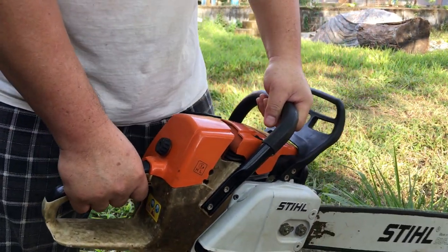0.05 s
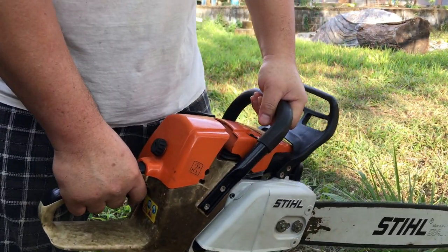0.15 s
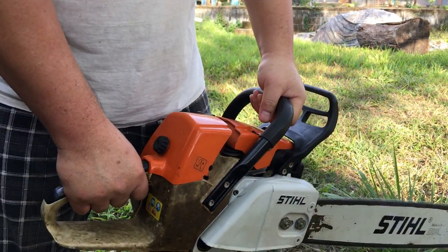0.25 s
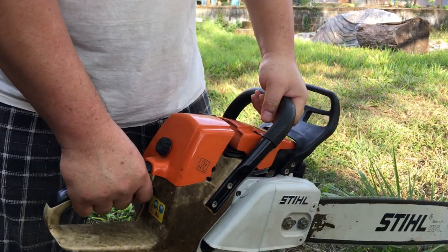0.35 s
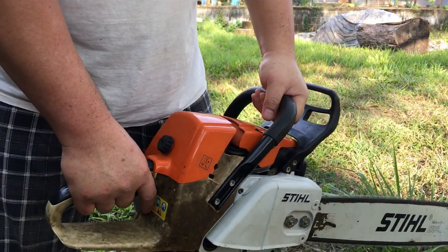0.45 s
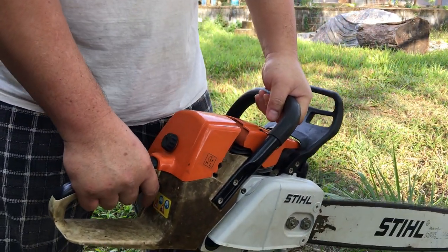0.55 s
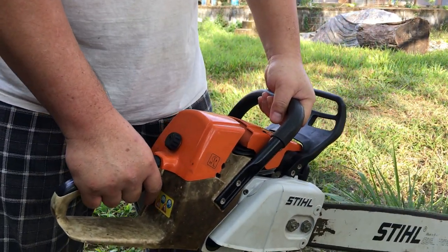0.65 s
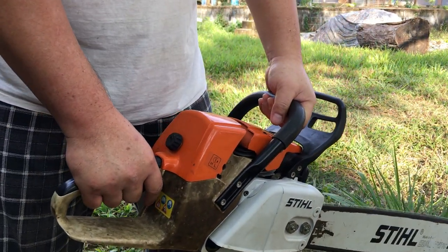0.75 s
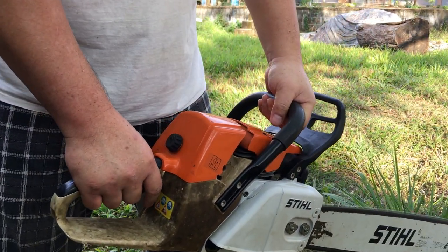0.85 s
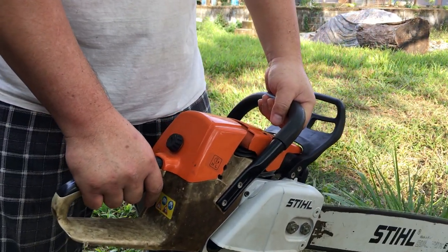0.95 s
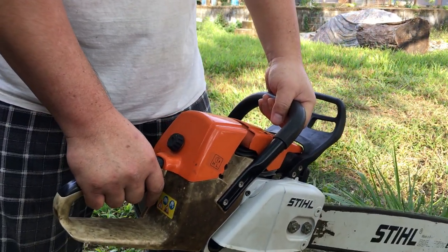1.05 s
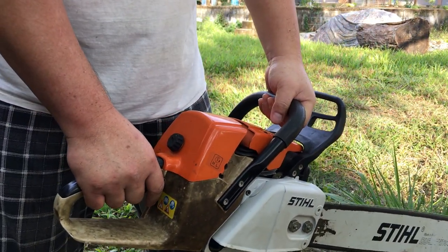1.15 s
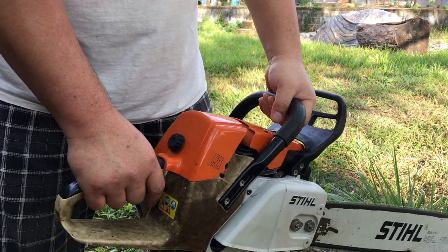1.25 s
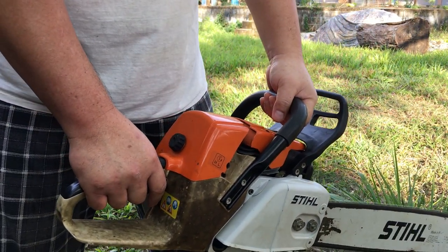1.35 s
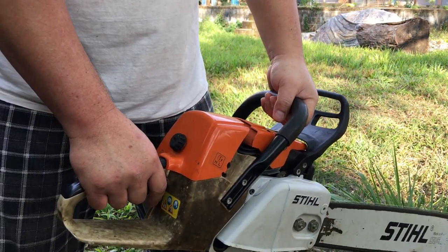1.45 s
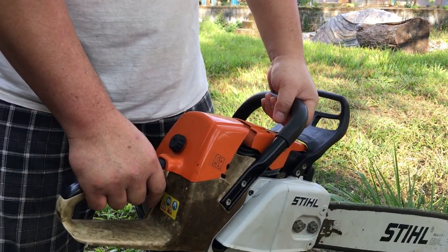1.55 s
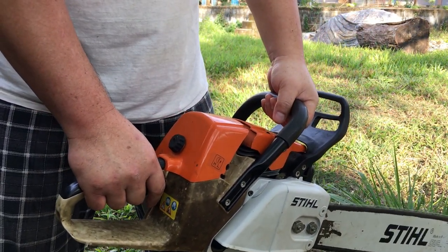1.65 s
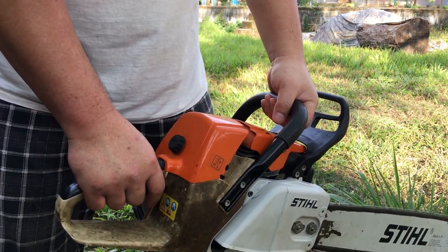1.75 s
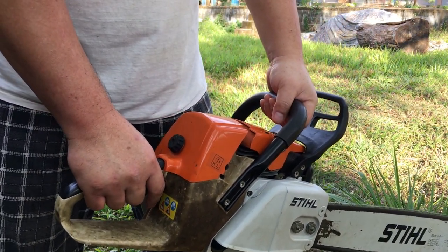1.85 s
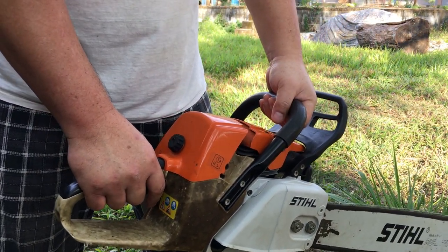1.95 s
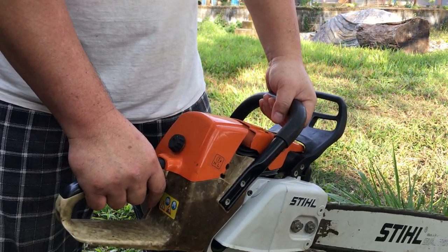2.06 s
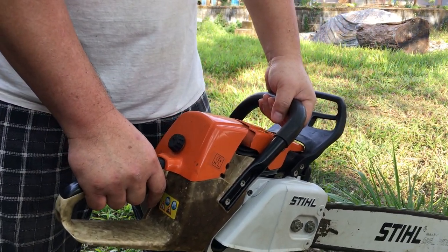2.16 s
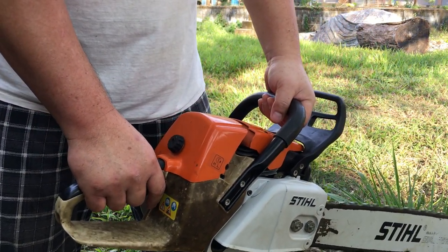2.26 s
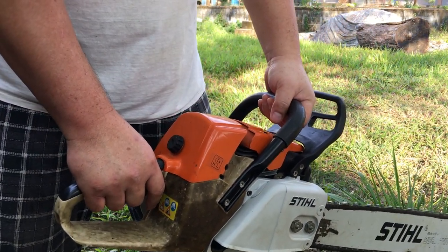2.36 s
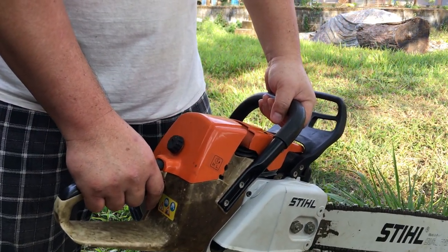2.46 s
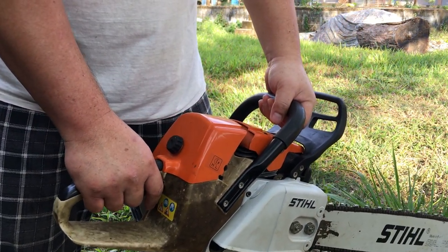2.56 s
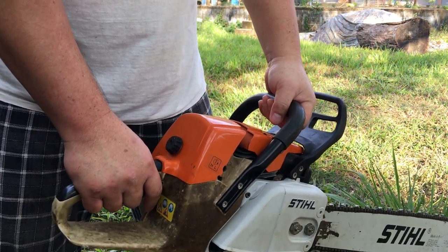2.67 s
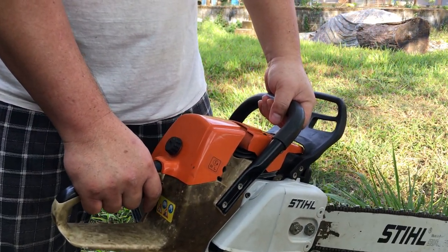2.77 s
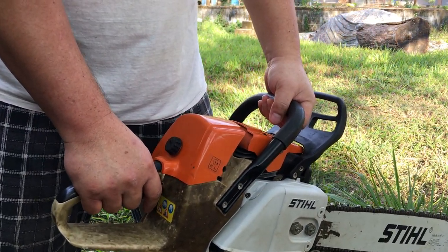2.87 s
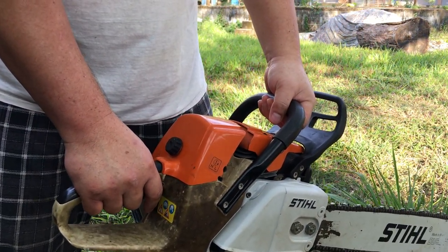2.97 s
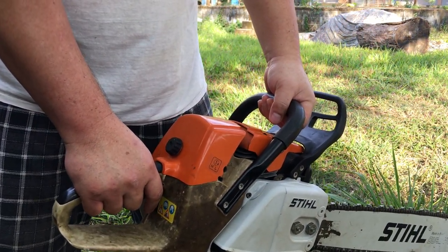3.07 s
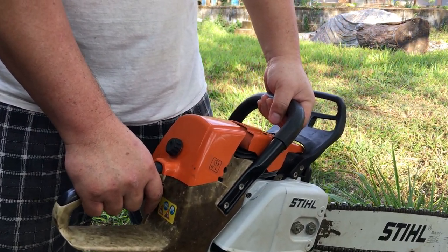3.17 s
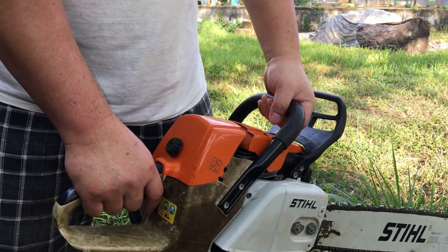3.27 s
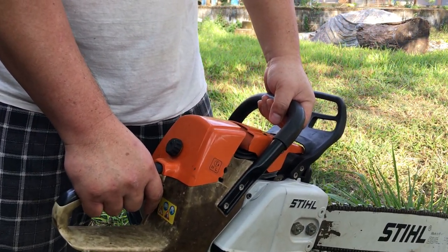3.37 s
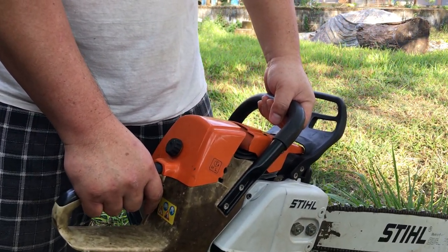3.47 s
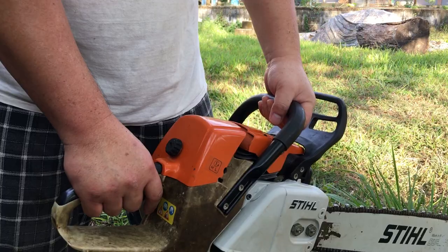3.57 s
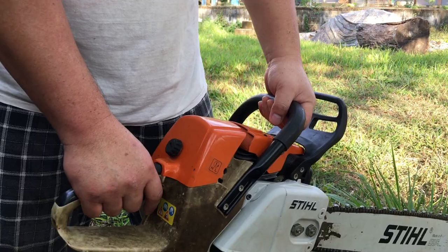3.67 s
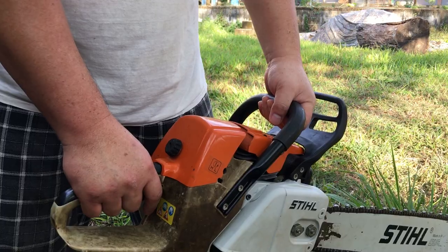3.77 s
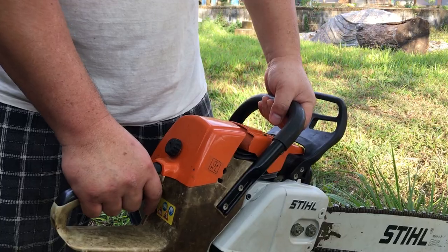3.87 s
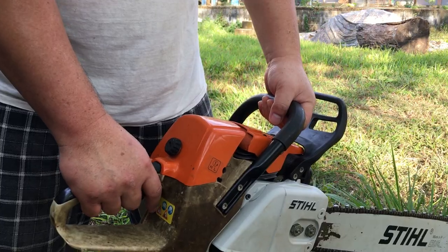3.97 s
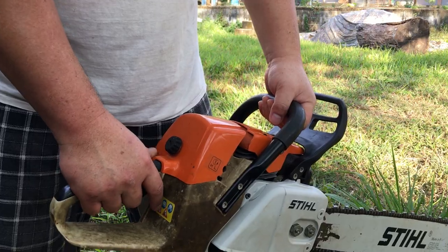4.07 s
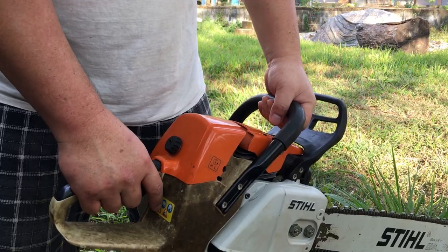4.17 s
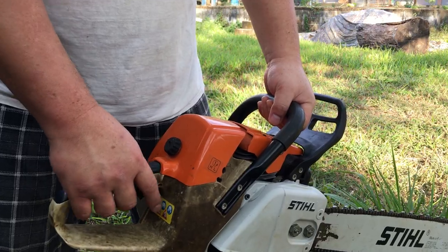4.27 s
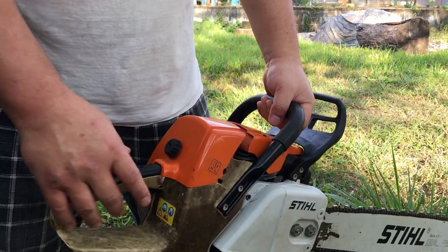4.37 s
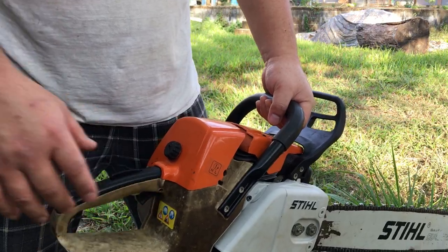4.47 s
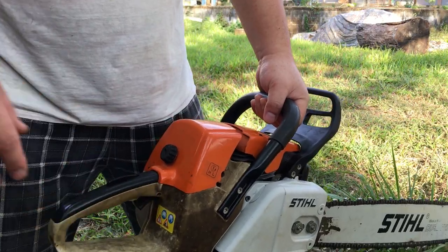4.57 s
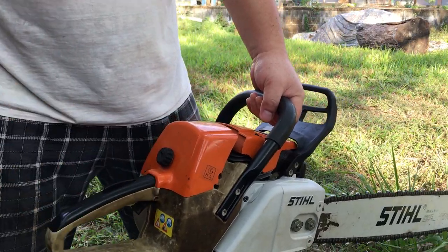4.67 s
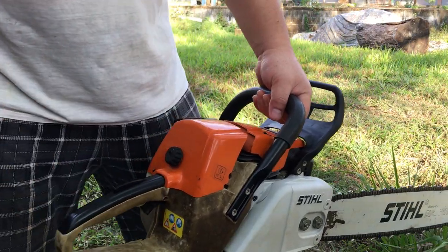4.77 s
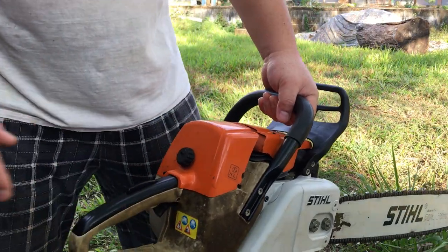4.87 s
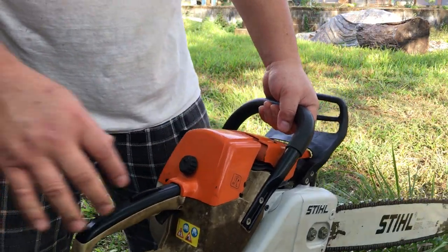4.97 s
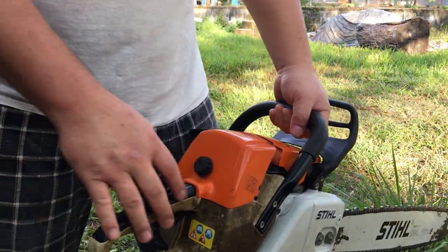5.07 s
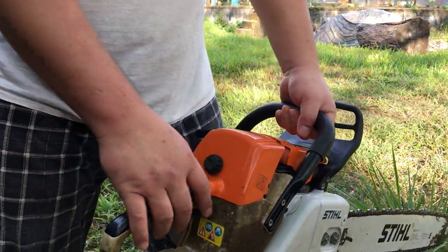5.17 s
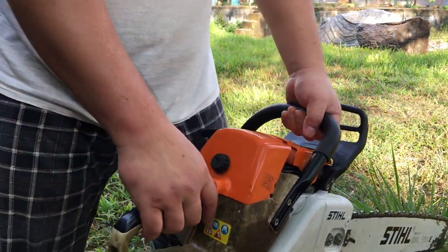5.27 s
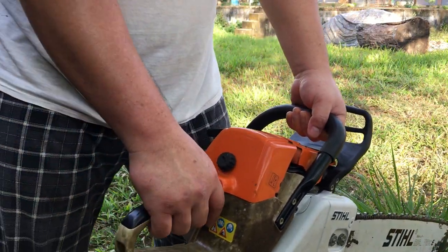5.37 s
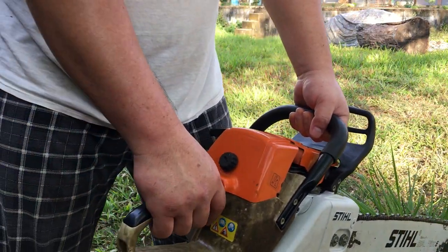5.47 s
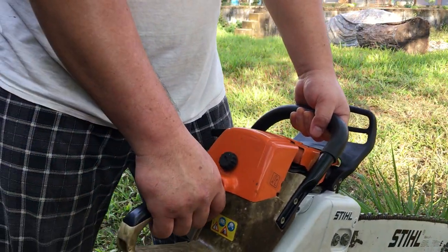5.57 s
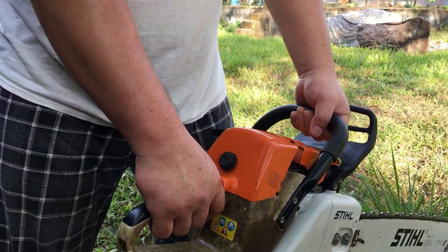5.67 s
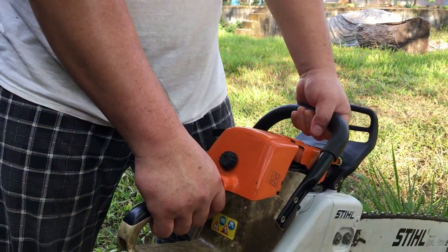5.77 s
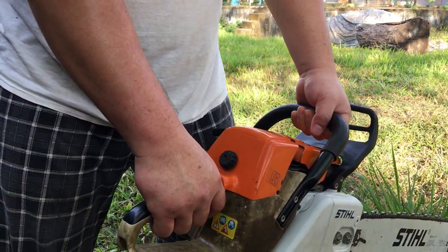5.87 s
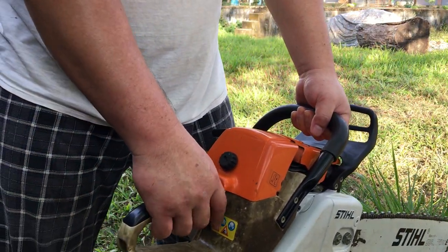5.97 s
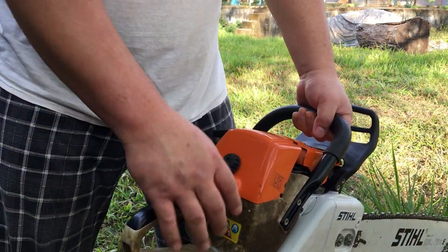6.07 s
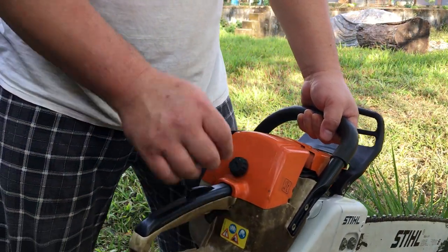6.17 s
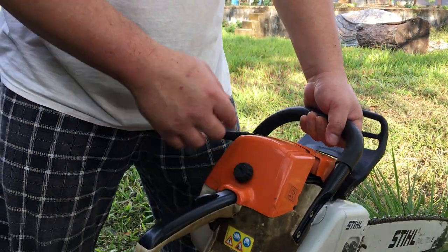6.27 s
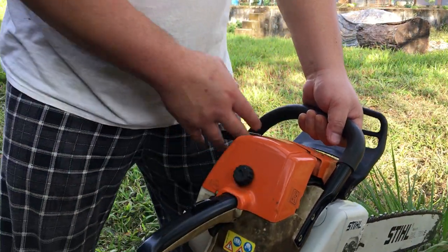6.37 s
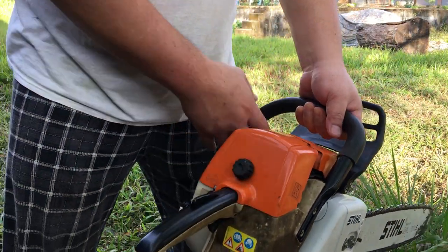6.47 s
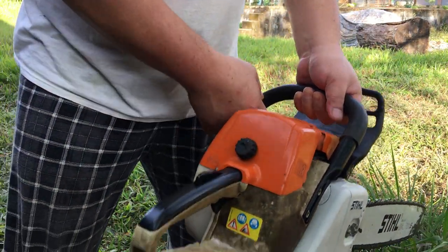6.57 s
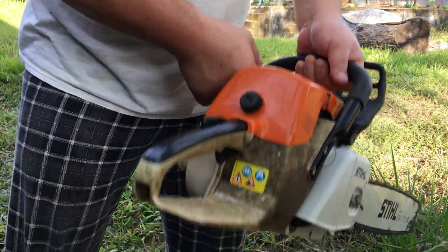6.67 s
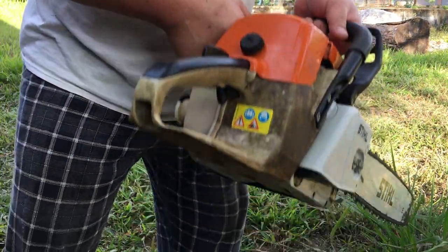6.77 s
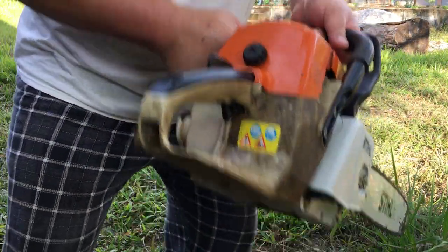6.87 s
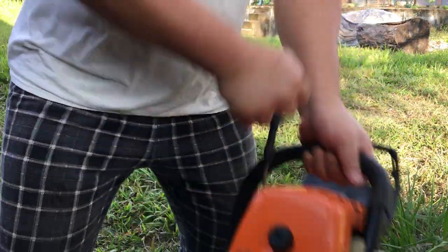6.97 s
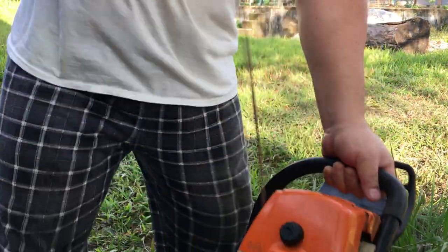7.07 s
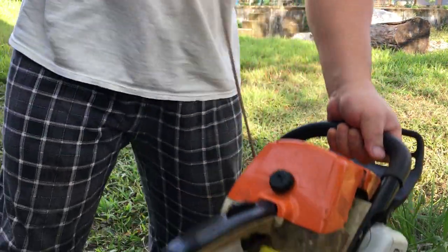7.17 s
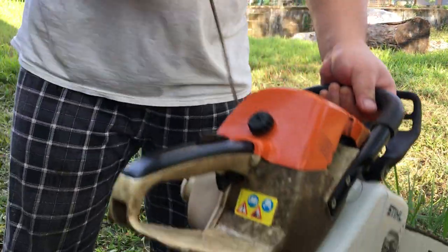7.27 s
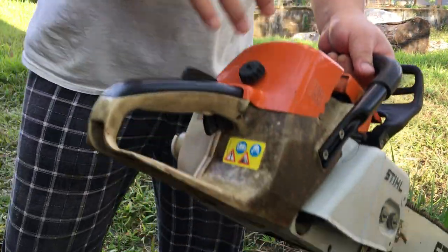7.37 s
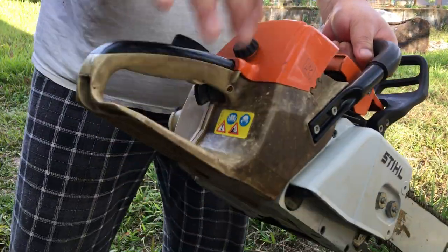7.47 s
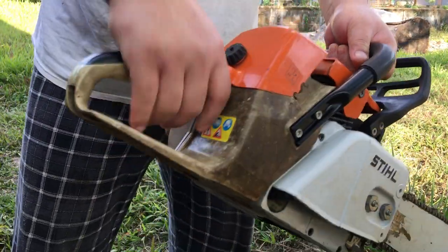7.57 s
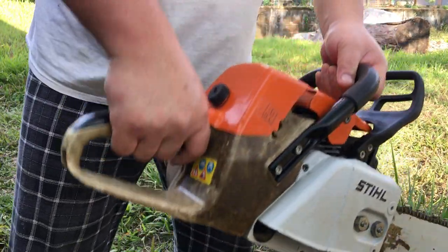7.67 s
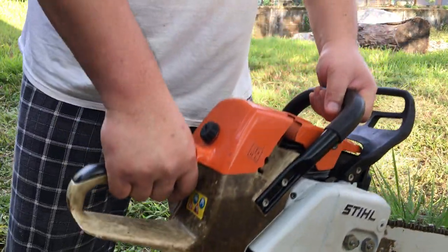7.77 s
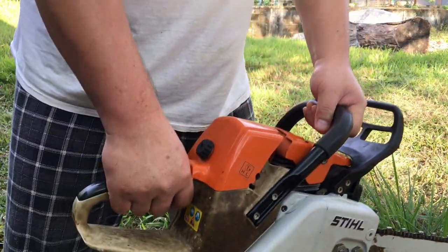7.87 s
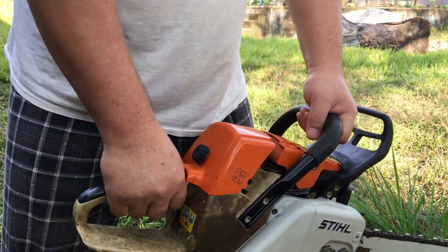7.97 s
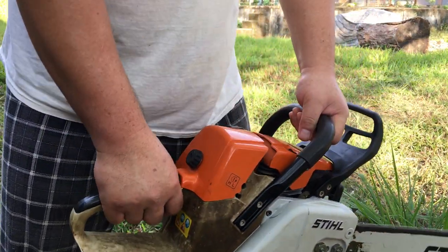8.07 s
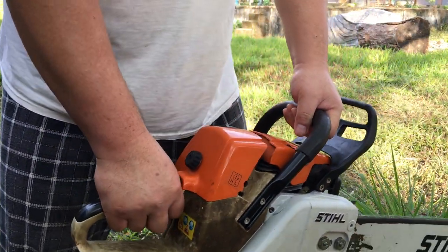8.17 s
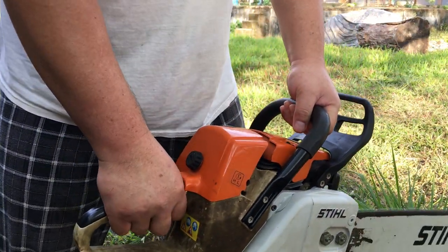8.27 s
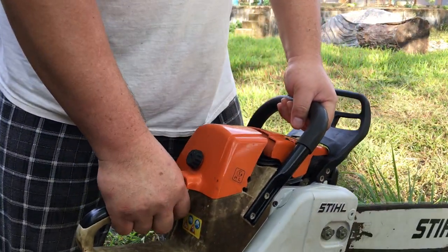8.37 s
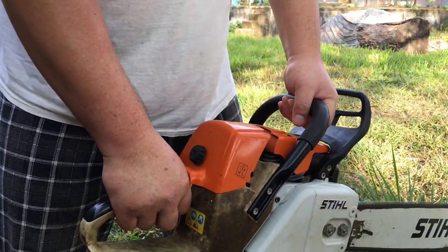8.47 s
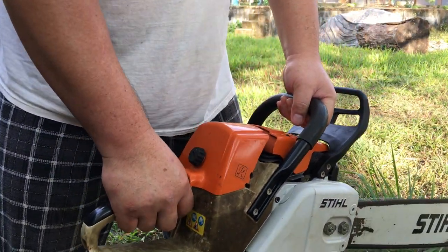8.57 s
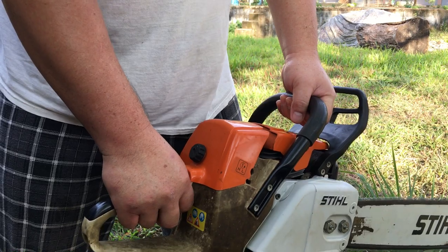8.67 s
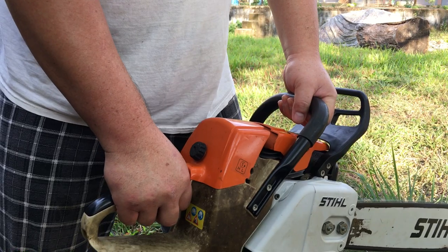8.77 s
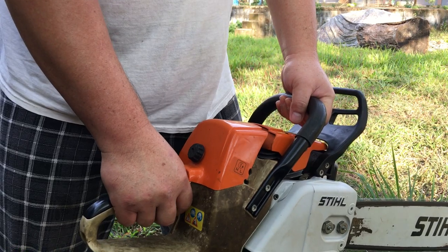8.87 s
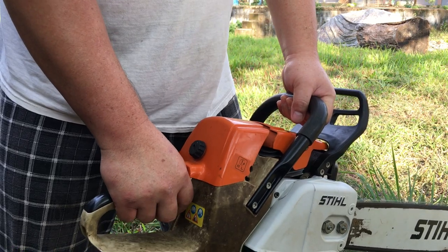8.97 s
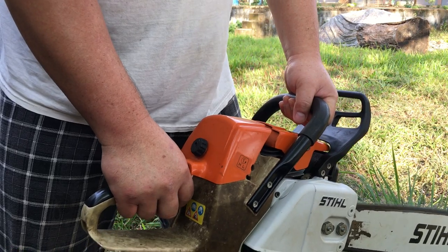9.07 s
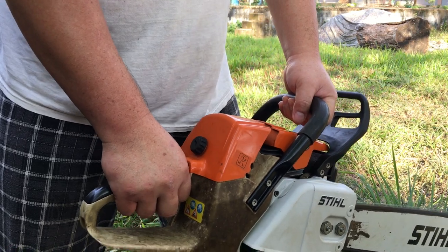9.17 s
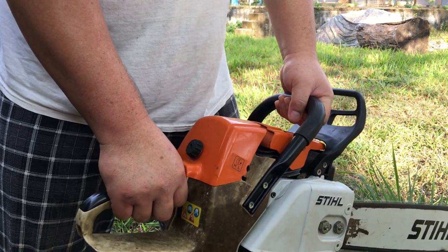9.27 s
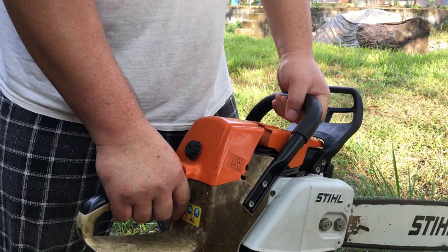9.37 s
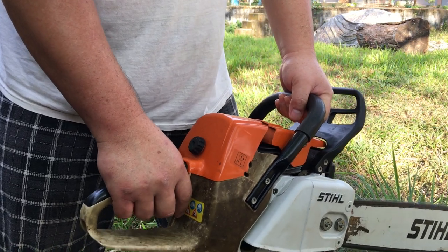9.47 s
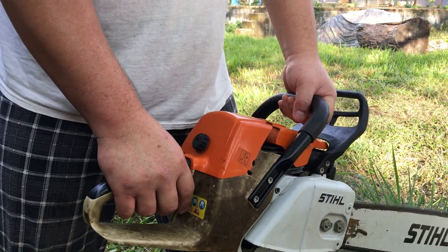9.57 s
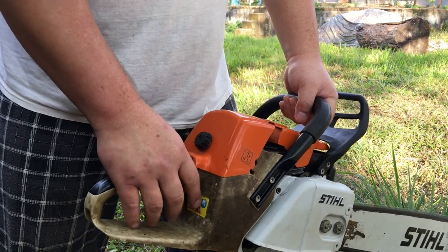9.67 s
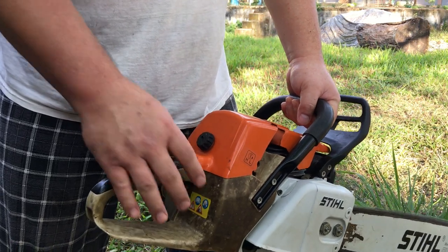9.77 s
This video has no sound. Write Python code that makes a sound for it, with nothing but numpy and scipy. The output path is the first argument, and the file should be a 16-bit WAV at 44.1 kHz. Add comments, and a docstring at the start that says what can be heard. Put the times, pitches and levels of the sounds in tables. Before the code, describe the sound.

Outdoors and very close, a two-stroke chainsaw gives three quick snarling throttle blips, coasts down to a rattling, popping idle, then is switched off and chuffs to a halt with a faint metallic ring. Soft plastic knocks and thin bird whistles follow over quiet air. A hard starter knock brings back a louder uneven idle, then five short rising revs.

```python
"""A two-stroke chainsaw close by in a garden: blipped, left to idle, switched off, pull-started, blipped again.
Every crank turn excites resonators: gas puffs through the muffler, shaken casing and chain ring with noise.
It fires on each turn under throttle, only now and then at idle, as pressure pulses with a crack of gas.
In the pause a steel part rings as a decaying sine, hands knock the housing in noise bursts and a bird
whistles gliding tones; behind lie a filtered-noise murmur and a thin insect hiss."""
import sys
import numpy as np
from scipy import signal
from scipy.fft import rfft, irfft
from scipy.io import wavfile
from scipy.ndimage import uniform_filter1d

SR = 44100
rng = np.random.default_rng(int(sys.argv[2]) if len(sys.argv) > 2 else 0)


def transcribe(signal):
    """Save signal, clipped to [-1, 1], as a 16-bit WAV file at the path in sys.argv[1]."""
    frames = np.atleast_2d(signal).T
    limited = np.clip(frames, -1, 1)
    pcm = np.round(limited * 32767).astype(np.int16)
    wavfile.write(sys.argv[1], SR, pcm)


N = 433503
T = np.arange(N) / SR  # time [s]

# throttle blips: (opens [s], closes [s], top speed [turns/s], relative firing level [dB])
BLIPS = [(-.3, 0.032, 117.6, 2), (0.134, 0.246, 144.3, -0.5), (0.352, 0.462, 161.2, -2.5),
         (8.065, 8.182, 80.37, 3), (8.297, 8.417, 123, 1), (8.53, 8.658, 154.3, -1),
         (8.816, 8.943, 165.3, -3.5), (9.26, 9.403, 158.8, -2.5)]
# lone sharp firings, about every sixth turn at idle: (time [s], relative level [dB])
POPS = [(0.1348, -10.5), (1.243, -16), (1.3482, -12), (1.4617, -12), (1.5858, -12), (1.7, -11),
        (1.8048, -11), (1.9085, -10.5), (2.162, -17.5), (2.3318, -11), (2.457, -11), (2.5629, -9.5),
        (2.7427, -14), (2.834, -11), (2.9242, -11.5), (3.088, -15), (3.1615, -12), (3.2338, -11),
        (3.3741, -11), (3.4664, -10.5), (3.57, -11.5), (3.86, -18), (4.0077, -11.5), (7.1217, -8),
        (7.2058, -15), (7.2644, -11.5), (7.34, -13), (7.415, -13), (7.492, -14), (7.644, -14), (7.7, -15),
        (7.8325, -13), (7.889, -10.5), (8.089, -15), (8.299, -13.5)]
# slow compression strokes without a firing: (time [s], relative muffler level [dB], relative rattle level [dB])
STROKES = [(4.385, -15, -21), (4.432, -6, -12.5), (4.488, -10, -10.5), (4.556, -9, -12),
           (4.637, -10.5, -19), (4.740, -12.5, -23.5), (4.892, -23, -26.5), (5.031, -33, -46),
           (7.093, -9.5, -9)]
# spectrum of the puffs in the muffler chamber: (frequency [Hz], level [dB])
MUFFLER = [(30, -17.5), (55, -5.5), (110, -14), (170, -9.5), (215, -1.5), (270, 4.5), (330, 1), (400, 3),
           (450, -2.5), (510, -21), (620, -10.5), (950, -23), (1300, -29.5), (4000, -68.5)]
# spectrum of the muffler's steel shell: (frequency [Hz], level [dB])
SHELL = [(300, -16.5), (500, -19), (590, 3), (700, 0), (800, -2.5), (930, 5.5), (1060, -18), (1200, -4.5),
         (1600, -7), (3000, -27.5)]
# spectrum of the exhaust pressure pulses: (frequency [Hz], level [dB])
EXHAUST = [(30, -15.5), (70, 11), (150, 6), (280, 10.5), (400, 7), (510, -8), (700, 5), (950, 1.5),
           (1200, -25.5), (2300, -8.5), (5000, -17), (15000, -51.5)]
# spectrum of the cracking gas: (frequency [Hz], level [dB])
CRACK = [(200, -25), (800, 11.5), (2200, 6.5), (2900, 0), (4500, 4.5), (6500, 8.5), (9500, 7), (12500, 3.5),
         (16000, -3)]
# spectrum of the shaken casing: (frequency [Hz], level [dB])
CASING = [(300, -12.5), (520, -11), (700, -19), (1000, -2.5), (1200, -12), (1600, -6), (1950, -11),
          (2150, 0), (2280, -8.5), (2400, -3), (2700, -29), (4000, -16), (12000, -24.5)]
# spectrum of the rattling chain: (frequency [Hz], level [dB])
CHAIN = [(1200, -22), (2600, -4.5), (3300, 1.5), (4300, 1), (4900, -5), (5800, 2.5), (7000, -3.5),
         (7900, -7), (9300, -1), (10400, -9), (11500, -4.5), (13000, -10), (16000, -20.5)]

# the ignition is cut, the crank falls to single strokes, the cord restarts it [s]
CUT_S, STALL_S, RESTART_S = 4.055, 4.41, 7.115
# idle speed before and after the restart [turns/s]; friction slows the dead engine
IDLE_HZ, RESTART_IDLE_HZ, FRICTION_HZ_PER_S = 53, 50, 87
# off throttle the speed decays exponentially; the knee says how abruptly the idle catches it
COAST_S, COAST_KNEE, THROTTLE_LAG_S = 1.02, 7, .012
# a lone firing kicks the crank ahead, then it sags again
KICK_HZ, KICK_S = 3, .1
# each part's gain at idle speed [dB], before the swell, and its rise with speed [dB per octave]
MUFFLER_DB, MUFFLER_DB_PER_OCTAVE = -22.5, -0.5
CASING_DB, CASING_DB_PER_OCTAVE = -28.5, 3.5
CHAIN_DB, CHAIN_DB_PER_OCTAVE = -31.5, 5.5
# the muffler swells slightly less than the rattling parts [dB per dB]
MUFFLER_SWELL = 0.95
# the chain slides to rest after the stall: decay [s]
CHAIN_SLIDE_S = 0.067
# a steel part rings on after the stall: pitch, level, decay
RING_HZ, RING_DB, RING_S = 1785, -45, .28
# the muffler's main resonance, which stands out on fast turns: centre, width, boost
BOOM_HZ, BOOM_WIDTH_HZ, BOOM_DB = 280, 83, 5
# the shell barks just before the chamber booms, so each stroke falls in pitch
BARK_LEAD_S = .002
# below idle the puffs grow long and deep: centre, width, boost as the speed tends to zero
DEEP_HZ, DEEP_WIDTH_HZ, DEEP_DB = 165.7, 70, 14


def undb(db):
    """Level to amplitude: 20 dB is a factor of ten."""
    return 10 ** (np.asarray(db) / 20)


def noise():
    """White noise of unit rms: equal power at all frequencies."""
    return rng.standard_normal(N)


def colour(x, points):
    """Minimum-phase filtering of unit energy with the given spectrum, falling off below its first point."""
    hz, db = np.transpose(points)
    grid = np.maximum(np.fft.rfftfreq(8192, 1 / SR), 1)
    gain = undb(np.interp(np.log(grid), np.log(hz), db))
    gain = gain * np.minimum(grid / hz[0], 1)
    # keeping only the causal half of the cepstrum makes the phase minimal
    cepstrum = irfft(np.log(gain))
    causal = 2 * cepstrum[:len(grid)]
    response = irfft(np.exp(rfft(causal, len(cepstrum))))[:len(grid)]
    return signal.fftconvolve(x, response / np.linalg.norm(response))[:N]


def resonance(x, hz, width_hz):
    """A single damped resonator: its bandwidth sets how long it rings."""
    return signal.lfilter(*signal.iirpeak(hz, hz / width_hz, fs=SR), x)


def reflect(x, tail):
    """Diffuse reflection: convolution with an echo tail brought to unit energy."""
    return signal.fftconvolve(x, tail / np.linalg.norm(tail))[:N]


def taps(times, sizes):
    """Ideal impulses, each shared between two neighbouring samples to keep its exact time."""
    out, place = np.zeros(N), np.clip(np.asarray(times) * SR, 0, N - 2)
    np.add.at(out, place.astype(int), sizes * (1 - place % 1))
    np.add.at(out, place.astype(int) + 1, sizes * (place % 1))
    return out


def fade(x, decay_s):
    """Exponential damping: each impulse becomes a tail of the same height."""
    return signal.lfilter([1], [1, -np.exp(-1 / (decay_s * SR))], x + 1e-18)


def steady(x, size=3500):
    """Power normalisation: the running rms is brought to about 1."""
    power = uniform_filter1d(uniform_filter1d(x ** 2, size), size)
    return x / np.sqrt(np.abs(power) + np.mean(x ** 2) / 1000)


def engine(jitter=0.014, idle_hz=55):
    """Periodic excitation by the crank: parts rattle louder with speed, firings mask the soft puffs."""
    crank_hz = speed()
    times, hz = crank(crank_hz)
    loose = np.minimum(idle_hz / hz, 1)  # a slow engine runs more unevenly
    times = times + jitter * loose ** 2 * rng.standard_normal(len(times)) / hz
    turning = uniform_filter1d(1. * running(), size=900)
    sliding = np.maximum(turning, np.exp(-np.abs(T - STALL_S) / CHAIN_SLIDE_S))
    octaves = np.log2(crank_hz / IDLE_HZ)
    swell_db = swell(T)
    muffler_gain = turning * undb(MUFFLER_DB + MUFFLER_DB_PER_OCTAVE * octaves + MUFFLER_SWELL * swell_db)
    casing_gain = turning * undb(CASING_DB + CASING_DB_PER_OCTAVE * octaves + swell_db)
    chain_gain = sliding * undb(CHAIN_DB + CHAIN_DB_PER_OCTAVE * octaves + swell_db)
    chamber, shell = muffler(times, hz, loose)
    shell = shell * np.interp(T, times, loose) ** -.25  # a little louder at speed
    casing, chain = clatter(times, hz, loose)
    puffs = chamber * muffler_gain + undb(-4.5) * shell * casing_gain
    puffs = undb(-10 * throttle(T)) * puffs
    return puffs + casing * casing_gain + chain * chain_gain + firing(times)


def running():
    """Free rotation: true while the crank spins by itself."""
    return (T < STALL_S) | (T > RESTART_S)


def speed():
    """Rotational dynamics [turns/s]: blips drive the crank up, it coasts to idle, friction slows it once cut."""
    idle = np.where(T < RESTART_S, IDLE_HZ, RESTART_IDLE_HZ)
    hz = idle
    for opens, closes, top_hz, db in BLIPS:
        peak_s = closes + THROTTLE_LAG_S
        rise = np.interp(T, [opens, peak_s], [np.interp(opens, T, hz), top_hz])
        left = np.exp(-COAST_KNEE * np.maximum(T - peak_s, 0) / COAST_S)
        coast = idle * (1 + ((top_hz / idle) ** COAST_KNEE - 1) * left) ** (1 / COAST_KNEE)
        hz = np.select([T < opens, T < peak_s], [hz, rise], coast)
    kicks = KICK_HZ * fade(taps(np.transpose(POPS)[0], 1.), KICK_S)
    braking = FRICTION_HZ_PER_S * np.maximum(T - CUT_S, 0) * (T < RESTART_S)
    return np.maximum(hz + kicks - braking, 20)


def crank(hz):
    """Phase is the integral of frequency: returns the time and speed of each whole turn."""
    angle = 2 * np.pi * np.cumsum(hz) / SR
    # lone firings and the first slow stroke are made to fall on whole turns
    marks = np.sort([s for s, db in POPS] + [STROKES[0][0]])
    excess = np.unwrap(np.interp(marks, T, angle) % (2 * np.pi))
    angle = angle - np.interp(T, marks, excess)
    new_turn = np.diff(np.floor(angle / (2 * np.pi))) > 0
    turn = np.flatnonzero(new_turn & running()[1:])
    return T[turn], hz[turn]


def throttle(times, open_s=0.011, close_s=0.014):
    """Amplitude envelope of the firing: the throttle opens quickly and closes more slowly."""
    strength = 0
    for opens, closes, top_hz, db in BLIPS:
        opening = np.clip((times - opens) / open_s, 0, 1)
        closing = np.clip((closes - times) / close_s + .5, 0, 1)
        strength = strength + undb(db) * opening * closing
    return strength


def swell(times):
    """Slow level envelope of the running saw [dB] at these times."""
    # overall level, on top of each part's own: (time [s], level [dB])
    swell_points = [(.5, -2), (.9, -1.5), (1.8, -0.44), (2.4, 3), (3.3, 4), (4.03, 4), (4.38, 0), (7.15, 4),
                    (7.5, 7.5), (8.03, 5), (8.25, 2), (8.49, -3.5), (8.7, -1.5), (9.8, -2.5)]
    return np.interp(times, *np.transpose(swell_points))


def firing(times, rough_db=.7, gulp_s=.04):
    """Impulsive combustion: every throttled turn sends a pressure pulse and a crack of gas; the intake gulps."""
    firings = taps(times, throttle(times) * undb(rough_db * rng.standard_normal(len(times))))
    exhaust = undb(12.5) * colour(firings, EXHAUST)
    gas = undb(-15) * colour(fade(firings, 0.0042) * noise(), CRACK)
    # the gulp sets in over the 14 ms before each opening
    opened = taps([opens for opens, *rest in BLIPS[1:]], 1.)
    opened = uniform_filter1d(opened, size=600, origin=-299)
    gulp_spectrum = [(30, -15), (80, -19), (380, -7), (550, -25.5), (3000, -35.5)]
    gulp = undb(-14.5) * colour(fade(opened, gulp_s) * noise(), gulp_spectrum)
    return gas + gulp - exhaust


def muffler(times, hz, loose, rough_db=1.1, burn_db=3, bass_hz=130,
            suck_turns=.115, suck=.6, coast_suck=.25, longest_s=.0022):
    """Cavity and shell resonance: each turn puffs in, then sucks back, sooner at speed; uneven burns ring steel."""
    chance = rng.standard_normal((len(times), 2)).T
    sizes = undb(rough_db * loose * chance[0])
    slow = loose > .8
    back = times + np.minimum(suck_turns / hz, longest_s)
    idling = taps(times, sizes * slow) - suck * taps(back, sizes * slow)
    fast = taps(times, sizes * ~slow) - coast_suck * taps(back, sizes * ~slow)
    # coasting fast on a shut throttle moves little gas: fast turns lose their bass
    fast = signal.sosfilt(signal.butter(2, bass_hz, "high", fs=SR, output="sos"), fast)
    fast = fast + undb(BOOM_DB) * resonance(fast, BOOM_HZ, BOOM_WIDTH_HZ)
    dying = taps(times, sizes * np.clip(1 - hz / IDLE_HZ, 0, 1))
    idling = idling + undb(DEEP_DB) * resonance(dying, DEEP_HZ, DEEP_WIDTH_HZ)
    barks = times - BARK_LEAD_S * loose
    burns = undb(burn_db * loose ** 2 * chance[1])
    sputter = undb(-15) * fade(taps(barks, burns * slow), 0.0027) * noise()
    chamber = steady(colour(idling + fast, MUFFLER))
    shell = steady(colour(taps(barks, burns) + sputter, SHELL), size=6000)
    return chamber, shell


def clatter(times, hz, loose, scatter_db=8.5, knock_s=0.02):
    """Structure-borne sound: the piston slaps twice a turn, shaking casing and chain."""
    chance = rng.standard_normal((len(times), 3)).T
    early = times - (0.32 + 0.11 * loose ** 2 * chance[0]) / hz
    slaps = taps(early, undb(scatter_db * loose * chance[1]))
    slaps += taps(times, undb(-12 + scatter_db * loose * chance[2]))
    shaking = fade(slaps, .007)
    # part of the knock is alike on every turn, more so at speed, which carries the pitch up into the treble
    age = T[:SR // 50]
    one_knock = rng.standard_normal(len(age)) * np.exp(-age / knock_s)
    knock = signal.fftconvolve(taps(times, 1.), one_knock)[:N]
    alike = np.interp(T, times, np.clip(.72 - .6 * loose, .1, .5))
    casing = np.sqrt(1 - alike) * steady(colour((shaking + 0.39) * noise(), CASING))
    casing = casing + np.sqrt(alike) * steady(colour(knock, CASING))
    # the chain's level flickers in steps of 40 samples
    links = undb(3.5 * np.repeat(rng.standard_normal(N // 40 + 1), 40)[:N])
    chain = steady(colour((shaking + 0.94) * links * noise(), CHAIN))
    chain = chain + alike * steady(colour(knock, CHAIN))
    return casing, chain


def idle_pops(tail_s=0.011):
    """Impulsive jet noise: a lone firing cracks sharply and pushes a slug of gas out of the muffler."""
    s, db = np.transpose(POPS)
    fired = taps(s, undb(db))
    crack = uniform_filter1d(fade(fired, .003), size=50)
    crack = crack + 0.096 * fade(fired, tail_s)
    pushed = taps(s + 0.0027, undb(db + swell(s)))
    slug_spectrum = [(30, -18), (70, 6), (150, 6.5), (350, -2.0), (550, -14), (2000, -40.0)]
    slug = undb(16) * colour(pushed, slug_spectrum)
    return undb(2.5) * colour(crack * noise(), CRACK) + slug


def clanks(decay_s=0.004):
    """Impact excitation: now and then the slack chain slaps the bar and jolts the casing."""
    # sharp clanks: (time [s], relative level [dB])
    clank_table = [(3.654, -16.5), (3.748, -28), (7.316, -15), (7.4694, -8), (7.562, -9), (7.6585, -17),
                   (7.957, -15), (7.9807, -7.5)]
    s, db = np.transpose(clank_table)
    burst = fade(taps(s, undb(db)), decay_s) * noise()
    return undb(-4) * colour(burst, CHAIN) + undb(1.5) * colour(burst, CASING)


def run_down(cavity_hz=255, cavity_width_hz=20):
    """Free vibration after single strokes: they chuff, ring the muffler cavity and rattle; a steel part rings on."""
    s, puff_db, rattle_db = np.transpose(STROKES)
    puffs = taps(s + 0.00615, undb(puff_db))
    chuff = undb(6) * colour(puffs, MUFFLER)
    chuff = chuff + undb(10.0) * colour(puffs, EXHAUST[:3] + [(600, -83)])
    hollow = undb(-19) * colour(fade(puffs, .02) * noise(), MUFFLER)
    cavity = undb(33) * resonance(puffs, cavity_hz, cavity_width_hz)
    deep = undb(26.5) * resonance(puffs, DEEP_HZ, DEEP_WIDTH_HZ)
    shaken = taps(s, undb(rattle_db))
    shake = (fade(shaken, 0.0049) + 0.057 * fade(shaken, 0.12)) * noise()
    rattle = undb(-13.5) * colour(shake, CASING) + undb(-17) * colour(shake, SHELL)
    rattle = rattle + undb(-34.0) * colour(shake, CHAIN)
    # the ring builds up from the first stroke and decays from the fifth
    build_up = np.clip(10 * (T - s[0]), 0, 1)
    decay = np.exp(-np.maximum(T - s[4], 0) / RING_S)
    ring = undb(RING_DB) * build_up * decay * np.sin(2 * np.pi * RING_HZ * T)
    return chuff + hollow + cavity + deep + rattle + ring


def handling():
    """Contact stiffness sets bandwidth: knocks on the plastic housing are duller when the contact is soft."""
    # switch, handle and starter knocks: (time [s], relative level [dB], decay [s], low-pass cutoff [Hz])
    knock_table = [(4.792, -14.5, 0.0072, 4900), (5.324, -25.5, 0.0065, 2180), (5.692, -17, 0.0033, 1976),
                   (5.887, -1, 0.0047, 16000), (6.08, -21, 0.0052, 3000), (6.526, -25.5, 0.0092, 2200),
                   (6.582, -25, .005, 2500), (6.930, -32, 0.03, 9000), (6.962, -19, 0.014, 8500),
                   (7.019, -16, 0.016, 3450), (7.052, 1.5, .004, 14000), (7.064, 15, 0.0088, 3830)]
    # spectrum of the plastic housing: (frequency [Hz], level [dB])
    housing_spectrum = [(200, -8.5), (500, 0.5), (800, 6.5), (1200, 3.5), (1700, 4), (2700, -2), (3800, -3),
                        (7000, -1.5), (10500, -8.5), (13000, -8.5), (16000, 6)]
    bursts = 0
    for s, db, decay_s, dull_hz in knock_table:
        hit = taps([s], undb(db))
        burst = (fade(hit, decay_s) + 0.01 * fade(hit, 0.021)) * noise()
        lowpass = signal.butter(2, min(dull_hz, SR / 2 - 1000), fs=SR, output="sos")
        bursts = bursts + signal.sosfilt(lowpass, burst)
    return undb(-13.0) * colour(bursts, housing_spectrum)


def bird(waver=0.0097, echo_s=0.21):
    """Frequency modulation: gliding whistles with a slight waver, echoed by trees and walls."""
    # whistles: (start [s], length [s], start pitch [Hz], middle pitch [Hz], end pitch [Hz], relative level [dB])
    whistle_table = [(4.922, 0.11, 4500, 4020, 3580, -60), (5.607, 0.18, 3080, 3700, 3960, -65),
                     (5.728, 0.14, 3940, 3680, 3480, -63), (5.94, 0.12, 4600, 3920, 3600, -62),
                     (6.07, 0.15, 3480, 3030, 2650, -77), (6.403, 0.069, 3580, 4670, 6700, -59.5),
                     (6.47, 0.13, 8000, 8500, 8200, -73), (6.58, 0.12, 6900, 6470, 6150, -68)]
    song = np.zeros(N)
    for start, length, *pitches, db in whistle_table:
        u = np.linspace(0, 1, int(length * SR))
        wobble = uniform_filter1d(rng.standard_normal(len(u)), size=100) * 10  # about unit rms
        glide = np.polyval(np.polyfit([0, .5, 1], pitches, 2), u)
        phase = 2 * np.pi * np.cumsum(glide * (1 + waver * wobble)) / SR
        envelope = np.abs(np.sin(np.pi * u)) ** .5
        first = int(start * SR)
        song[first:first + len(u)] += undb(db + 2.5) * envelope * np.sin(phase)
    tail = rng.standard_normal(SR // 2) * np.exp(-T[:SR // 2] / echo_s)
    return song + undb(-4) * reflect(song, tail)


def garden(murmur_db=-54.5, hiss_hz=10100, hiss_width_hz=400):
    """Filtered noise: a low, gently fluctuating murmur of air and a thin, high insect hiss in a narrow band."""
    # spectrum of the outdoor air: (frequency [Hz], level [dB])
    air_spectrum = [(25, -29), (70, -12), (100, -22.5), (135, -22.5), (200, -25.5), (650, -32.5),
                    (1500, -36.5), (2700, -47), (7500, -53), (10500, -55), (12000, -67.5), (15000, -59)]
    drift = np.interp(T, np.linspace(0, T[-1], 80), rng.standard_normal(80))
    murmur = undb(murmur_db + 0.93 * drift) * colour(noise(), air_spectrum)
    insects = undb(-63) * resonance(noise(), hiss_hz, hiss_width_hz)
    return murmur + insects


def scene(yard_s=0.073):
    """Superposition: the saw with its faint garden echo, hands on the housing, a bird and the open air."""
    saw = engine() + idle_pops() + clanks() + run_down()
    # ground and garden wall send back a faint, short, dull echo
    tail = rng.standard_normal(SR // 2) * np.exp(-T[:SR // 2] / yard_s)
    tail = signal.lfilter(*signal.butter(1, 2500, fs=SR), tail)
    yard = undb(-17) * reflect(saw, tail)
    return (saw + yard + handling() + bird() + garden())[None]


def record(dry, ceiling=0.56, top_hz=15900):
    """Saturation and band limiting: the loudest peaks are rounded and the top is cut."""
    lowpass = signal.ellip(10, .2, 70, top_hz, fs=SR, output="sos")
    return signal.sosfilt(lowpass, ceiling * np.tanh(dry / ceiling))


dry = scene()
out = record(dry)
transcribe(out)
```